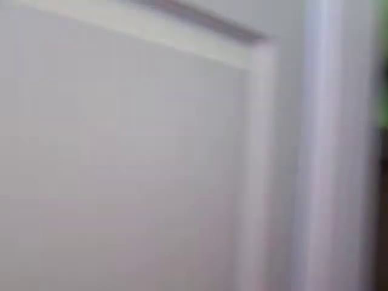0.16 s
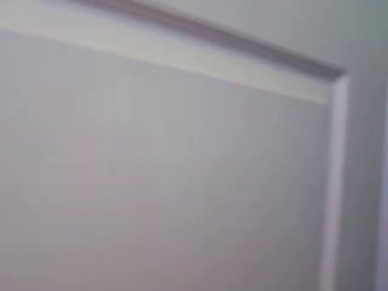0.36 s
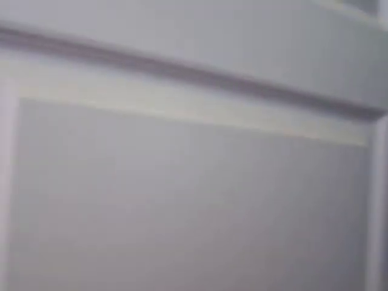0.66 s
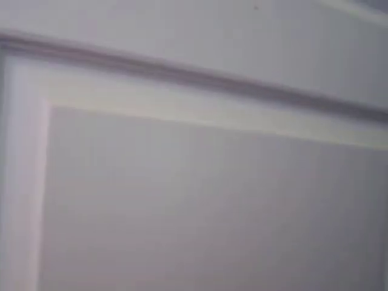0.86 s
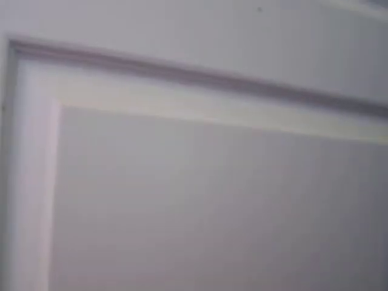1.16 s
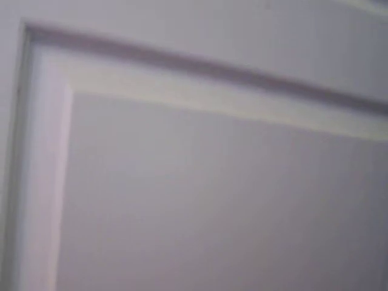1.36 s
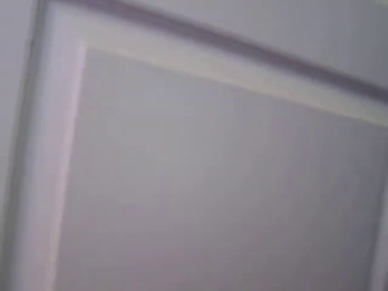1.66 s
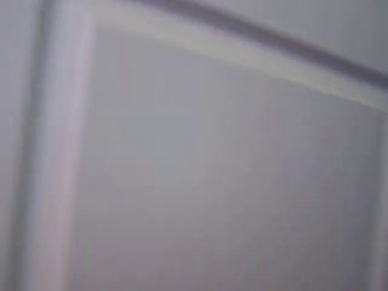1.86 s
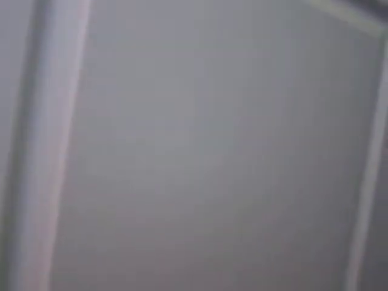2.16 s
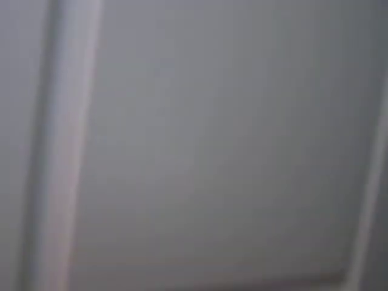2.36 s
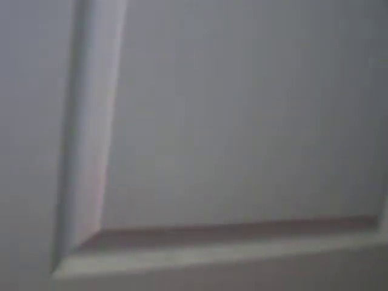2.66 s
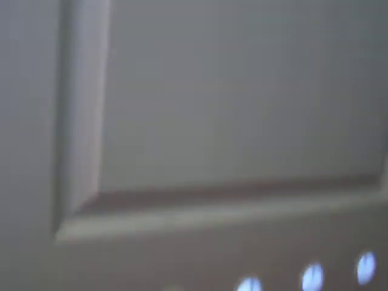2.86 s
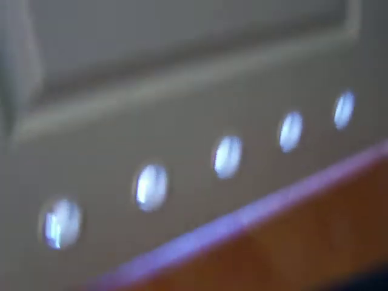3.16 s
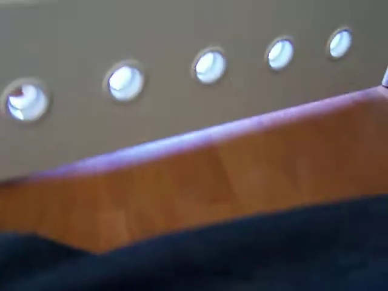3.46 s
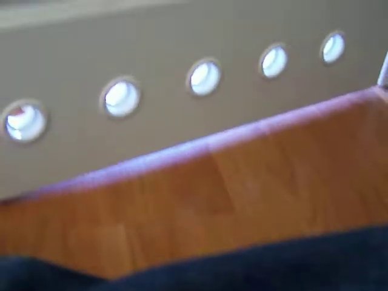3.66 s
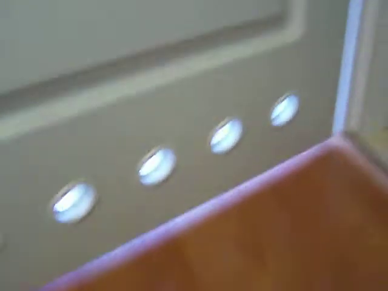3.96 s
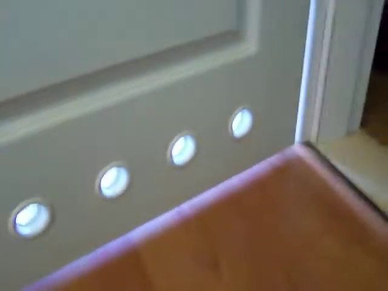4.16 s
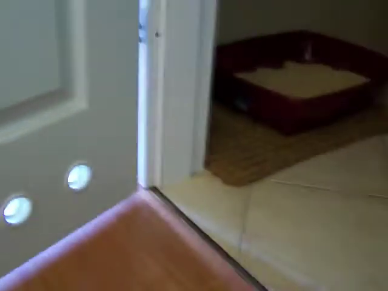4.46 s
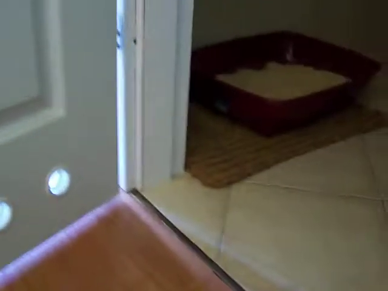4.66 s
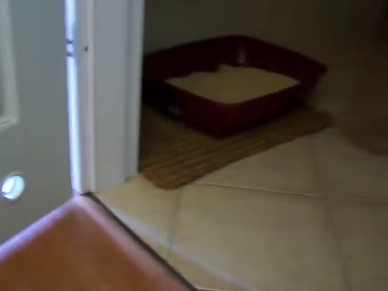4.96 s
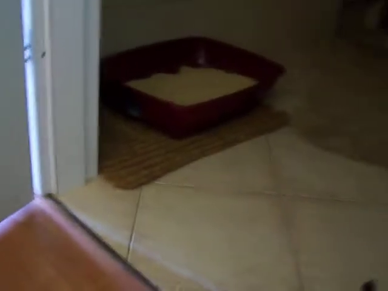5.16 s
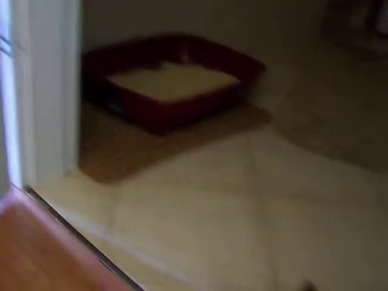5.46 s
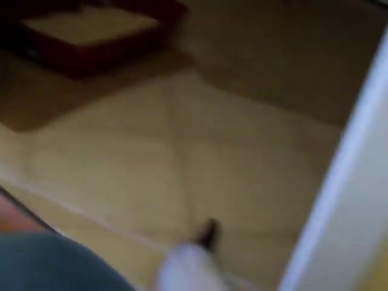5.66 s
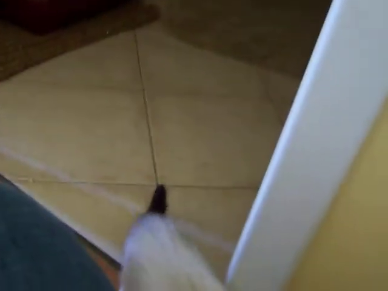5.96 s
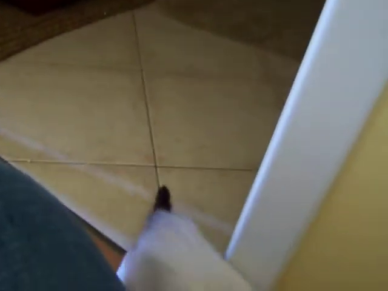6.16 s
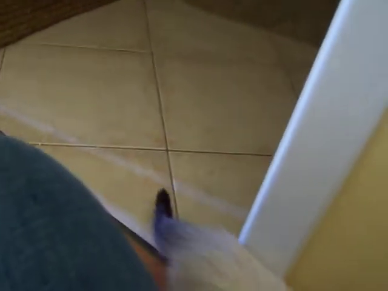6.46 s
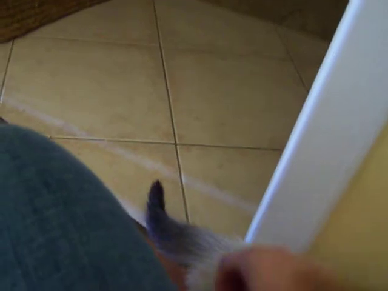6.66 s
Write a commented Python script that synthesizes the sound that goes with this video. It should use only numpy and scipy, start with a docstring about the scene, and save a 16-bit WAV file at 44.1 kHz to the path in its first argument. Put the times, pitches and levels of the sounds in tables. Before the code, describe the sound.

Someone crouching in a quiet flat rustles their trousers and handles a small plastic case, which ticks, snaps and once pings, then near silence.

```python
"""Plastic ticks and snaps close to the microphone, one setting a small steel spring ringing; fingers scrape the
case and trouser cloth swishes. Someone crouches by a door in a quiet flat, a small camera in hand.
Under it lie an appliance's hum, a hollow drone, low handling rumble and microphone hiss.
Ticks and spring are decaying sines; cloth, scrapes, drone, rumble and hiss are coloured noise under level
curves; the hum is wavering sines. A small passage answers the ticks."""
import sys
import numpy as np
from scipy import signal
from scipy.fft import rfft, irfft, next_fast_len
from scipy.io import wavfile

SR = 44100
rng = np.random.default_rng(int(sys.argv[2]) if len(sys.argv) > 2 else 0)


def unload_audio(sound):
    """Save the sound as a 16-bit wav file, at the path given as the first command line argument."""
    columns = np.transpose(np.atleast_2d(sound))
    # keep every value between -1 and 1, then stretch to whole-number steps
    steps = np.round(np.clip(columns, -1, 1) * 32767)
    wavfile.write(sys.argv[1], SR, steps.astype(np.int16))


N = 299571  # length in samples

# Spectra of the noise layers, shape only: (f/Hz, level/dB per Hz)
# microphone hiss
HISS_SPECTRUM = [(15, -6.5), (40, 3), (90, 0.5), (200, -7.5), (330, -11.5), (500, -14), (960, -15.5),
                 (2340, -19), (3500, -26), (6180, -25.5), (7300, -29), (8000, -45), (9000, -64.5)]
# hollow drone in the passage
DRONE_SPECTRUM = [(60, -51.5), (130, -18), (245, -13), (285, -1), (325, -12), (500, -32), (1500, -90.5)]
# the hand shaking the microphone
RUMBLE_SPECTRUM = [(3, -3.5), (12, 6), (30, -3), (45, -10), (80, -31), (300, -90)]
# cloth fibres rubbing
SWISH_SPECTRUM = [(410, -46.5), (700, -22), (1140, -15.5), (1250, -16.5), (1820, -13.5), (2020, -12),
                  (2310, -13), (3200, -6), (3690, -2.5), (4250, -7.5), (6730, -20.5), (7370, -32),
                  (8000, -45.5), (10400, -71.5), (17600, -120)]
# cloth folding
FOLDS_SPECTRUM = [(90, -62.5), (200, -25), (360, -2), (500, -1.5), (750, -4.5), (1100, -12.5), (1600, -31),
                  (4000, -90.5)]
# skin on the plastic case
SCRAPE_SPECTRUM = [(240, -50), (400, -18), (631, -21), (719, -18), (811, -20.5), (882, -19), (959, -21),
                   (1090, -12), (1260, -10), (1460, -15.5), (2160, -0.5), (2890, -17.5), (3760, -15.5),
                   (4600, -17.5), (5200, -28.5), (7000, -40), (9100, -66.5), (15400, -120)]
# the wide crack that starts a tick
CRACK_SPECTRUM = [(200, -38), (600, -2.5), (1500, 1), (3000, -4.5), (4700, -3), (5400, -15.5),
                  (6200, -21.5), (7500, -35), (9000, -51.5)]

# Level curves of the steady layers: (t/s, level/dB)
# appliance hum
HUM_LEVEL = [(0.0, -61), (0.09, -54), (0.23, -67), (0.68, -55.5), (1.06, -63.5), (2.23, -62), (2.32, -52),
             (2.48, -64.5), (2.74, -54), (2.78, -65), (2.95, -51), (3.04, -63), (3.19, -52), (4.58, -60.5),
             (4.63, -55), (6.62, -60.5), (6.71, -52), (6.79, -54)]
# hollow drone in the passage
DRONE_LEVEL = [(0.0, -66), (.23, -79), (.74, -67), (.92, -77), (1.03, -62), (1.22, -63), (1.5, -80),
               (1.95, -68), (2.04, -58), (2.25, -74), (2.6, -67), (2.9, -73), (3.17, -60), (3.75, -66),
               (4.05, -80), (4.8, -69), (5.1, -80), (5.65, -78), (5.72, -66), (6.07, -65), (6.15, -73.5),
               (6.79, -74)]
# low handling rumble
RUMBLE_LEVEL = [(0.0, -50), (0.36, -60.5), (1.99, -60), (2.02, -47), (2.72, -54), (2.78, -67), (2.82, -50),
                (4.07, -59.5), (4.18, -44), (4.33, -60), (4.42, -52), (4.58, -53), (4.71, -55), (4.76, -68),
                (4.84, -55.5), (5.22, -62.5), (6.68, -66), (6.79, -72)]

# partials of the hum: (multiple of its pitch, level/dB)
HUM_PARTIALS = [(0.999, 0), (1.53, -15), (2, -15), (3.06, -18.5)]
# movements of the cloth: (full at t/s, rise/s, hold/s, fall/s, swish level/dB, folds level/dB)
CLOTH_STROKES = [(0.0, .05, 0.076, 0.21, -53.5, -73), (.32, 0.05, 0.042, 0.08, -52.5, -62.5),
                 (.41, 0.057, 0.028, 0.028, -42, -69), (.47, .03, .02, .18, -52, -70),
                 (.79, 0.064, 0.0057, 0.088, -54.5, -71), (.87, 0.064, 0.12, .05, -60, -70.5),
                 (.955, .03, .02, 0.092, -64, -65.5), (1.04, .04, .28, 0.095, -50, -66),
                 (1.43, 0.059, 0.14, .05, -59.5, -73), (1.61, 0.046, 0.44, 0.19, -52, -63.5),
                 (1.69, .05, .01, .08, -62, -58), (2.41, 0.054, .08, 0.13, -51.5, -62),
                 (2.55, 0.099, 0.0091, 0.14, -43.5, -68), (2.62, 0.04, 0.099, 0.14, -52.5, -59.5),
                 (2.936, 0.13, 0.066, .04, -54.5, -70.5), (3.06, 0.056, 0.062, 0.066, -50.5, -54),
                 (3.197, 0.018, 0.0045, 0.048, -62, -50), (3.32, .09, .08, 0.076, -51, -61.5),
                 (3.636, 0.13, .005, 0.11, -51, -64.5), (3.8, 0.054, .02, 0.2, -64, -70.5),
                 (4.092, .02, 0.0044, .15, -74, -65.5), (4.356, 0.043, .005, 0.1, -72, -67.5),
                 (4.85, .1, .05, 0.2, -68.5, -71), (5.104, 0.042, .005, 0.045, -73, -64),
                 (5.326, 0.017, 0.0053, 0.019, -85, -68), (5.88, .3, .12, .3, -71, -78),
                 (6.53, .1, .05, .2, -73.5, -80)]
# fingers sliding on the case: (full at t/s, rise/s, hold/s, fall/s, level/dB, treble against it/dB)
FINGER_SLIDES = [(2.415, .01, .19, .01, -59, 4), (2.91, .015, .055, 0.028, -43, -5),
                 (3.102, 0.075, .001, .005, -43.5, 0), (3.125, .005, .045, .02, -53, -3),
                 (3.296, 0.11, .03, 0.0057, -47, 3.5), (3.968, 0.035, .001, 0.019, -57.5, 7),
                 (4.107, .003, .001, 0.04, -47, 3.5), (4.27, 0.026, .001, 0.033, -64, 1),
                 (4.327, 0.0087, .06, .01, -51.5, 0), (4.39, 0.014, .001, 0.023, -45, -2),
                 (4.495, .01, .014, 0.0084, -65.5, 2.5), (4.524, .01, .001, 0.0027, -48, -9.5),
                 (4.74, .003, .001, 0.046, -51.5, -1), (4.803, 0.095, .001, .004, -50, 2),
                 (5.697, .015, .33, 0.012, -69, -1), (6.051, 0.014, .001, .06, -67.5, 3.5)]
# bending modes of the spring: (f/Hz, relative level/dB, t60/s)
SPRING_MODES = [(528, -27, 1.4), (781, -22, 0.5), (991, -27, 0.6), (1130, -13, 0.45), (1680, -19, 0.4),
                (1852, 1, 0.3), (2363, -14, 0.18), (2514, -24, 0.2), (2676, -4, 0.2), (3144, -11, 0.32),
                (3348, -32, 0.58), (3558, -5, 0.26), (3576, -9, 0.15), (4161, -19, 0.25), (4506, -3, 0.15)]
# touches on the case: (t/s, t60/s, main peak level/dB, main f/Hz, then for the low, lower-middle and
# high modes: level against the main/dB, f/Hz)
CASE_TICKS = [(0.0869, 0.035, -33, 1916, 1.5, 397, 4, 1250, -6, 3150),
              (1.574, 0.037, -61, 2470, 12.5, 456, -10, 738, 1, 3630),
              (1.64, .03, -57, 2070, 8.5, 467, 2, 975, -9, 3320),
              (2.0018, 0.047, -50, 2680, 12, 296, -5, 1010, 1, 3800),
              (2.2619, 0.038, -39, 2010, -7.5, 560, -3.5, 1210, -23, 3550),
              (2.2844, .03, -44.5, 2090, -19, 227, -9, 1280, -9, 4310),
              (2.354, 0.043, -37, 2100, -18, 670, -23.5, 735, -10.5, 3400),
              (2.3965, 0.044, -39, 1970, -5, 672, -17, 696, -10, 3370),
              (2.7696, 0.037, -18.5, 2180, -34, 668, -12.5, 892, -10, 2890),
              (2.8693, .025, -48.5, 2270, -9, 202, 2, 1230, -8.5, 3120),
              (3.0427, 0.028, -38.5, 2220, -13, 468, -10, 1380, 5.5, 3570),
              (3.1043, .03, -32.5, 2050, -26, 530, -12, 706, -24, 4210),
              (3.1123, 0.037, -30.5, 1940, 4.5, 575.6, 0, 1164, 1, 2690),
              (3.1184, 0.032, -33, 2180, 4, 563, -14, 898, 3, 3813),
              (3.1429, .03, -43.5, 2190, 5.5, 317, -3, 797, -2, 3520),
              (3.1943, 0.046, -36, 2060, -1.5, 541, 9.5, 1137, -12.5, 3420),
              (3.2187, 0.023, -44.5, 1406, 1.5, 346.4, -12, 859, 7, 3500),
              (3.232, .03, -45, 2270, -13, 438, -14, 980, 4.5, 3540),
              (3.2686, .035, -37.5, 2240, 1.5, 453, 2.5, 748, -11, 3480),
              (3.2959, .03, -45, 2240, -13, 516, -12, 1420, -9, 3600),
              (3.3377, 0.033, -11.5, 2100, -18.5, 710, -19.5, 770, -5, 4520),
              (3.746, .03, -31, 1800, -15.5, 697, -8, 1250, -16, 3400),
              (3.8026, .035, -48.5, 2200, -11, 304, -25, 1130, -2, 4750),
              (3.8124, 0.028, -45, 2320, -22, 262, -21, 1170, 2, 4250),
              (3.9753, 0.043, -36.5, 2260, -8, 550, -4.5, 725, -4.5, 3520),
              (3.995, .05, -53, 1680, 2.5, 555, 13, 927, -15, 3240),
              (4.009, 0.069, -60.5, 1900, 4, 566, 10, 930, -9, 3260),
              (4.0954, 0.031, -36.5, 1810, -13, 585, -9, 1100, -23, 4600),
              (4.2009, 0.028, -44.5, 2131, -23, 269, -9, 1410, -3.5, 3740),
              (4.2399, .03, -55.5, 1720, 1.5, 567, -6, 714, -14, 3440),
              (4.3208, .03, -49, 2220, -23, 237, -9, 1280, -13, 3510),
              (4.3914, .03, -45.5, 2200, -26, 680, -27, 1220, -11, 3900),
              (4.4635, .027, -50, 1780, -14, 291, -16, 748, -4, 4330),
              (4.4772, .026, -53.5, 1720, -9, 345, -18, 740, -11, 4060),
              (4.5314, 0.02, -8.5, 1990, -29.5, 626, -9.5, 1134, -3.5, 4440),
              (4.711, .024, -27.5, 1940, -26, 204, -5.5, 1120, -5.5, 2900),
              (4.7376, .045, -42, 2230, -21, 412, -13, 1380, -14, 3060),
              (4.8025, 0.031, -35.5, 2260, -0.5, 561, -10, 820, -16, 3700),
              (4.8278, 0.031, -35, 2034, -3.5, 488, -5, 1400, -2, 4260),
              (4.8326, 0.027, -34.5, 1990, -1, 363, -5.5, 936, -7, 4170),
              (5.028, .03, -55.5, 2190, -25, 199.7, -20, 730, -7, 3340),
              (5.0389, 0.028, -53.5, 2200, -21, 231, -10, 1150, 5, 2980),
              (5.1049, .03, -61, 1840, 2, 520, 0, 773, -5.5, 3320)]
# case modes in the groups main, low, lower-middle, high: (multiple of the group's f, level/dB, factor on t60)
CASE_MODES = [
    [(.84, -3.5, 0.3), (1, 3, 0.46), (1.02, -15.5, 1.3), (1.2, -5, 0.5)],
    [(.22, -11, 2.5), (.4, -5.5, 1.1), (.7, -4, 1.1), (1, -0.5, 1.6), (1.3, -11, 1.9), (1.75, -7.5, 1.6)],
    [(.62, -10.5, 1), (.77, -10, 1.9), (1, 6.5, 0.6), (1.25, -4.5, .5)],
    [(.68, -5, 0.398), (.8, -1.5, 0.64), (.89, -3, .45), (1, -0.5, 0.81)],
]

HISS_DB, HUM_HZ = -63.5, 55.3
STILL_SWISH_DB, STILL_FOLDS_DB = -75, -85  # the cloth between movements
FADE_DB = 12  # how far a movement sinks over its rise or fall time
SPRING_S, SPRING_DB, DAMPED_S = 4.533, -31, 4.715  # struck, strength, and when a finger stops it
RATTLE_S = .004  # time constant of the after-slips
AFTER_DB, AFTER_PER_DB = -9.5, -.25  # after-slips at a -29 dB tick; harder snaps break cleaner
EDGE_HZ = 8600  # upper band limit
OFFSET, SILENCE_DB = -.0011, -102  # the converter's standing offset (full scale = 1) and flat noise


def gain_of(db):
    """Decibels to an amplitude factor."""
    return 10 ** (np.asarray(db) / 20)


def evened(x):
    """Scales a sound to unit RMS."""
    return x / np.sqrt(np.mean(x ** 2) + 1e-20)


def add(mix, s, sound):
    """Lays a sound into the mix from s seconds on, cut at the end."""
    part = mix[round(s * SR):][:len(sound)]
    part += sound[:len(part)]


def along(rows):
    """The columns of a curve at every sample."""
    s, *columns = np.transpose(rows)
    return [np.interp(np.arange(N) / SR, s, c) for c in columns]


def strokes(rows):
    """Each movement rises, holds and falls; its two level columns share that shape, and powers add."""
    t = np.arange(N) / SR
    power = np.zeros((2, N))
    for s, rise, hold, fall, *dbs in rows:
        before = (s - t) / max(rise, .001)
        after = (t - s - hold) / max(fall, .001)
        away = np.maximum(before, after).clip(0)
        power += gain_of(np.array(dbs)[:, None] - FADE_DB * away) ** 2
    return np.sqrt(power)


def colour(x, spectrum):
    """Gives a sound a spectrum read on a log-frequency axis, at unit RMS."""
    f, db = np.transpose(spectrum)
    size = next_fast_len(len(x))
    hz = np.fft.rfftfreq(size, 1 / SR)
    gain = gain_of(np.interp(np.log(hz + 1), np.log(f + 1), db))
    return evened(irfft(rfft(x, size) * gain, size)[:len(x)])


def coloured_noise(spectrum):
    """Gaussian noise of a given spectrum over the whole scene."""
    return colour(rng.standard_normal(N), spectrum)


def flutter(rate_hz, depth_db):
    """A random slow wobble as a factor: low-passed noise, its RMS depth in dB."""
    slow = signal.lfilter(*signal.butter(2, rate_hz, fs=SR), rng.standard_normal(N))
    return gain_of(depth_db * evened(slow))


def fibres(per_s, spread_db, grain):
    """Smooth noise mixed with many tiny slips of uneven size; grain is the slips' share of power."""
    sizes = gain_of(spread_db * np.minimum(rng.exponential(1, N), 4))
    slips = sizes * (rng.random(N) < per_s / SR) * rng.choice([-1., 1.], N)
    return np.sqrt(grain) * evened(slips) + np.sqrt(1 - grain) * rng.standard_normal(N)


def ring(t, modes, rise_cycles):
    """Decaying sines of alternating sign, each swelling over its first cycles as the contact is soft."""
    out = np.zeros(len(t))
    for k, (hz, db, t60) in enumerate(modes):
        decay = gain_of(db - 60 * t / t60)
        swell = (1 - np.exp(-t * hz / rise_cycles)) ** 2
        out += (-1) ** k * decay * swell * np.sin(2 * np.pi * hz * t)
    return out


def hiss():
    """Steady microphone hiss: noise with most of its power low down."""
    return gain_of(HISS_DB) * coloured_noise(HISS_SPECTRUM)


def hum():
    """An appliance's hum: sines whose shared pitch and separate levels waver."""
    turns = np.cumsum(HUM_HZ * flutter(rate_hz=3.5, depth_db=0.38)) / SR
    tone = np.zeros(N)
    for multiple, db in HUM_PARTIALS:
        wavering = gain_of(db) * flutter(rate_hz=6.0, depth_db=2.5)
        tone += wavering * np.sin(2 * np.pi * multiple * turns)
    return np.sqrt(2) * gain_of(along(HUM_LEVEL)[0]) * tone  # root 2: a sine's peak against its RMS


def drone():
    """A hollow drone in the passage: a narrow band of noise that swells and sinks."""
    return gain_of(along(DRONE_LEVEL)[0]) * coloured_noise(DRONE_SPECTRUM)


def handling():
    """The hand shakes the microphone at the edge of hearing: very low noise."""
    return gain_of(along(RUMBLE_LEVEL)[0]) * coloured_noise(RUMBLE_SPECTRUM)


def room(x, t60=0.2, delay_s=0.0037, dull=0.83):
    """A small passage answers with a short dense tail of dulled, decaying noise."""
    t = np.arange(SR // 4) / SR
    dulled = signal.lfilter([1], [1, -dull], rng.standard_normal(len(t)))
    tail = dulled * gain_of(-60 * t / t60) * (t > delay_s)
    return signal.fftconvolve(x, tail / np.linalg.norm(tail))[:N]


def cloth():
    """Trouser fibres rub bright and folds rub dull, both following the movements."""
    swish = colour(fibres(per_s=2500, spread_db=3.0, grain=0.27), SWISH_SPECTRUM)
    swish *= flutter(rate_hz=30, depth_db=0.44)
    folds = colour(fibres(per_s=300, spread_db=2.0, grain=0.25), FOLDS_SPECTRUM)
    folds *= flutter(rate_hz=13, depth_db=1.3)
    still = gain_of([[STILL_SWISH_DB], [STILL_FOLDS_DB]])
    bright, dull = np.hypot(strokes(CLOTH_STROKES), still)
    return bright * swish + dull * folds


def slides():
    """Skin catches and slips in quick uneven grains that sound through the case; each has its own treble."""
    level, bright = strokes([(*row[:5], row[4] + row[5]) for row in FINGER_SLIDES])
    grains = colour(fibres(per_s=1200, spread_db=3.0, grain=0.62), SCRAPE_SPECTRUM)
    grains *= flutter(rate_hz=39, depth_db=2.0)
    treble = signal.sosfiltfilt(signal.butter(4, 2900, "high", fs=SR, output="sos"), grains)
    return level * (grains - treble) + bright * treble


def spring():
    """Bending modes of a thin steel part, dying fast once it is touched again."""
    t, out = np.arange(SR // 2) / SR, np.zeros(N)
    touched_db = -900 * np.maximum(t - (DAMPED_S - SPRING_S), 0)  # 900 dB per second
    add(out, SPRING_S, gain_of(SPRING_DB + touched_db) * ring(t, SPRING_MODES, rise_cycles=1.5))
    return out


def slip_train(db):
    """One unit slip of the plastic with twelve random after-slips, dying out behind it."""
    later = rng.uniform(0, 4 * RATTLE_S, 12)  # s after the first slip
    strength = gain_of(AFTER_DB + AFTER_PER_DB * (db + 29)) * rng.uniform(-1, 1, 12)
    slip = np.zeros(900)
    np.add.at(slip, (later * SR).astype(int), strength * np.exp(-later / RATTLE_S))
    slip[0] += 1
    return slip


def ticks(crack_db=1.5, dull_db=-12, crack_share=.4):
    """Each tick is a wide crack and a train of slips that rings the case; the grip shifts its modes."""
    out, t = np.zeros(N), np.arange(5000) / SR
    noise = coloured_noise(CRACK_SPECTRUM)
    for touch_s, t60, db, main_hz, *rest in CASE_TICKS:
        s = touch_s + .0005  # the plastic gives way just after the touch
        slip = slip_train(db)
        for modes, more_db, group_hz in zip(CASE_MODES, [0, *rest[::2]], [main_hz, *rest[1::2]]):
            shifted = [(m * group_hz, mode_db, max(k * t60, .004)) for m, mode_db, k in modes]
            sound = signal.fftconvolve(ring(t, shifted, rise_cycles=0.91), slip)
            add(out, s, gain_of(db + more_db) * sound / abs(sound).max())
        decay = gain_of(-60 * t / (crack_share * t60))
        crack = noise[round(s * SR):][:len(t)] * decay * (1 - np.exp(-t / .0003)) ** 2
        share_db = max(rest[4], dull_db)  # follows the high modes, down to a least share
        add(out, s, gain_of(db + share_db + crack_db) * crack / abs(crack).max())
    return out


def scene():
    """Everything at the microphone: the bed, the cloth, the hand on the case, and the ticks with their tail."""
    bed = hiss() + hum() + drone() + handling()
    hits = ticks()
    return (bed + cloth() + slides() + spring() + hits + gain_of(-24.5) * room(hits))[None]


def record(dry):
    """The band limit, then the converter's offset and faint flat noise."""
    low_pass = signal.firwin(511, EDGE_HZ, window=("kaiser", 9), fs=SR)
    kept = signal.oaconvolve(dry, low_pass[None], "same")
    return kept + OFFSET + gain_of(SILENCE_DB) * rng.standard_normal(dry.shape)


dry = scene()
out = record(dry)
unload_audio(out)
```